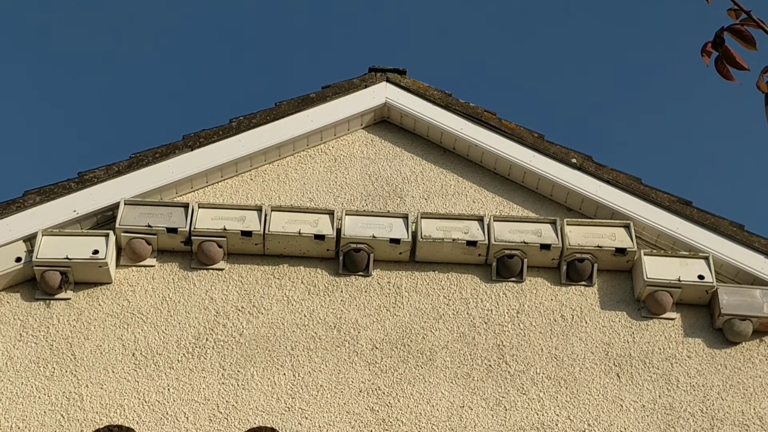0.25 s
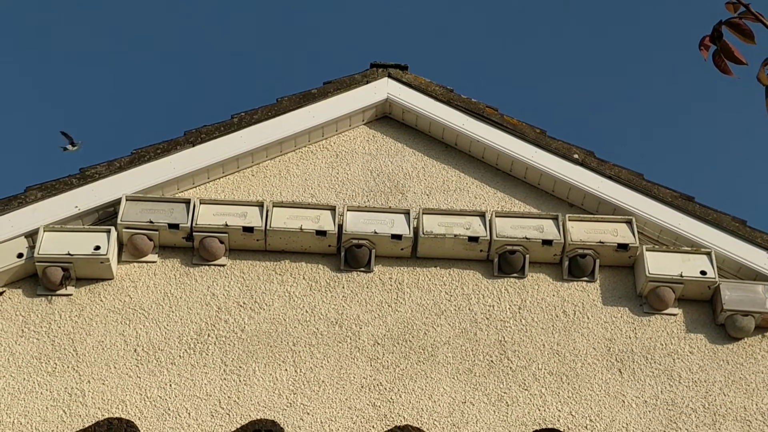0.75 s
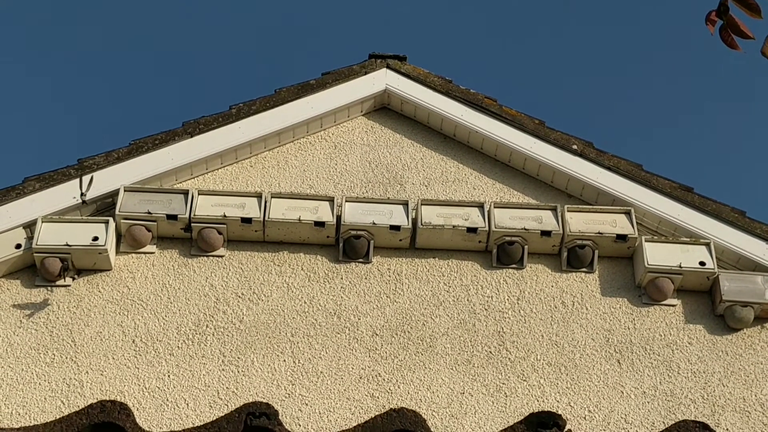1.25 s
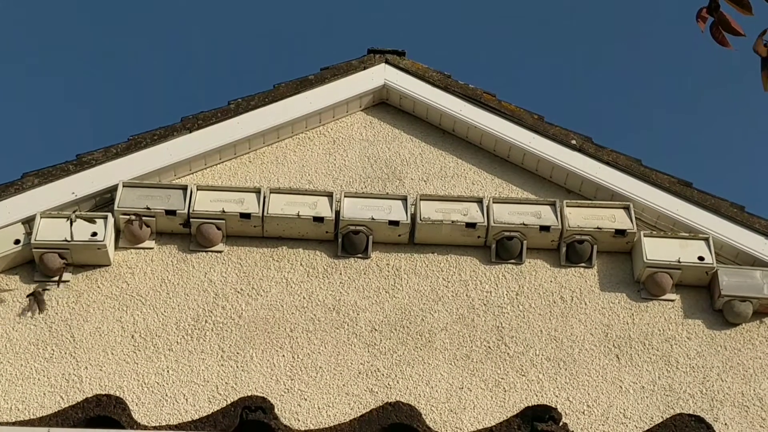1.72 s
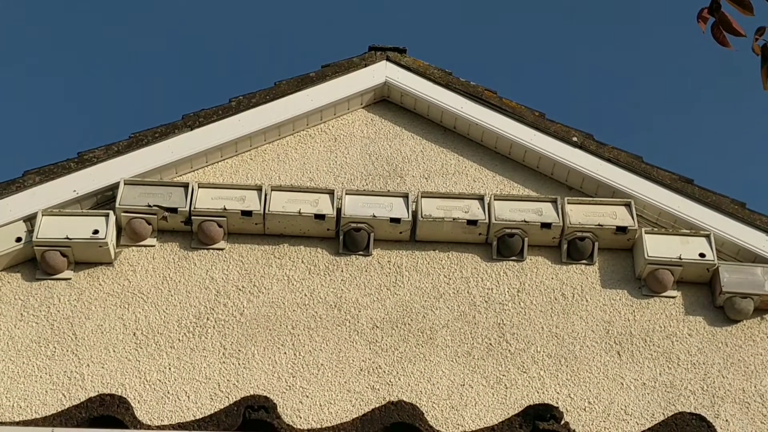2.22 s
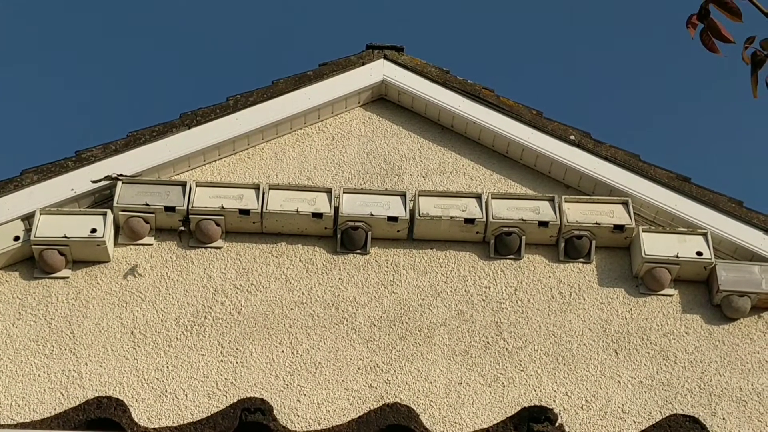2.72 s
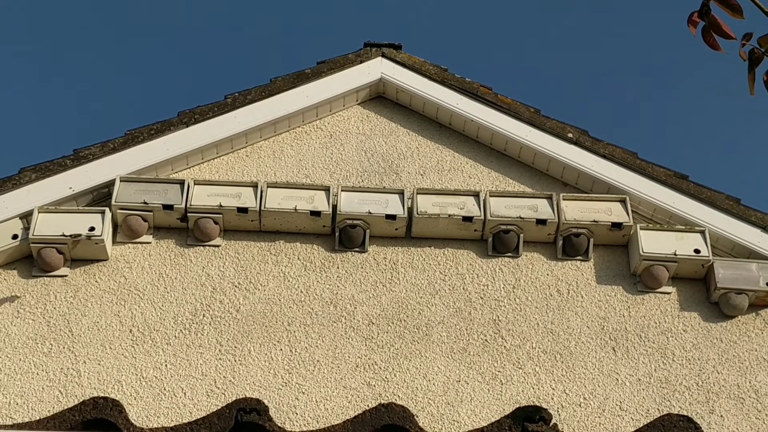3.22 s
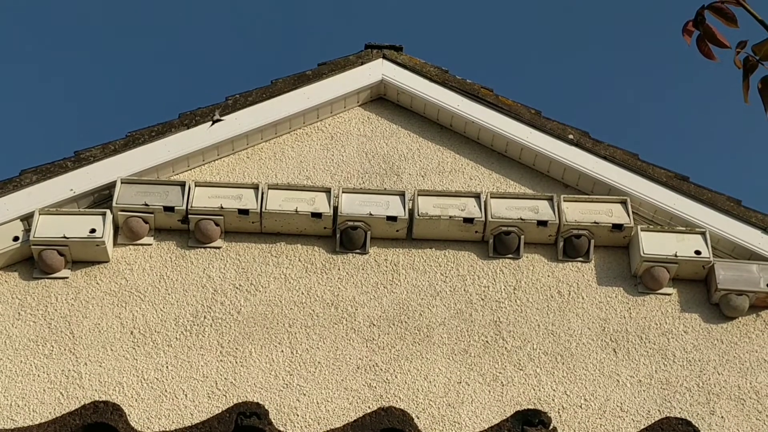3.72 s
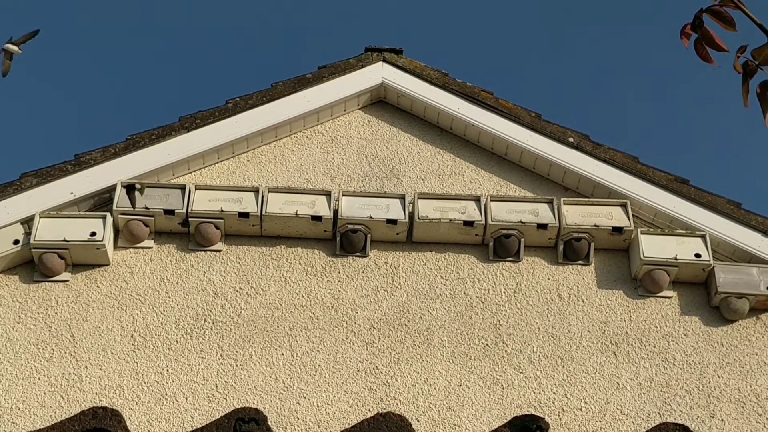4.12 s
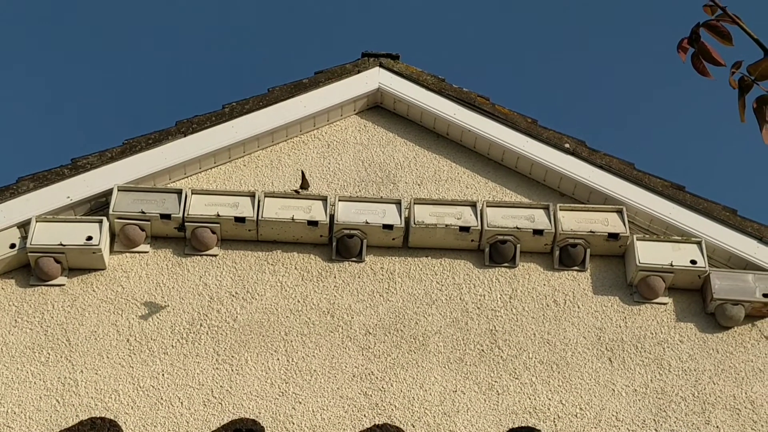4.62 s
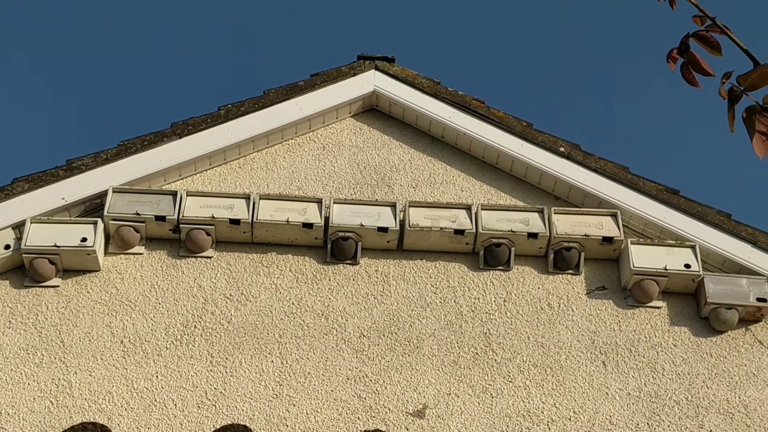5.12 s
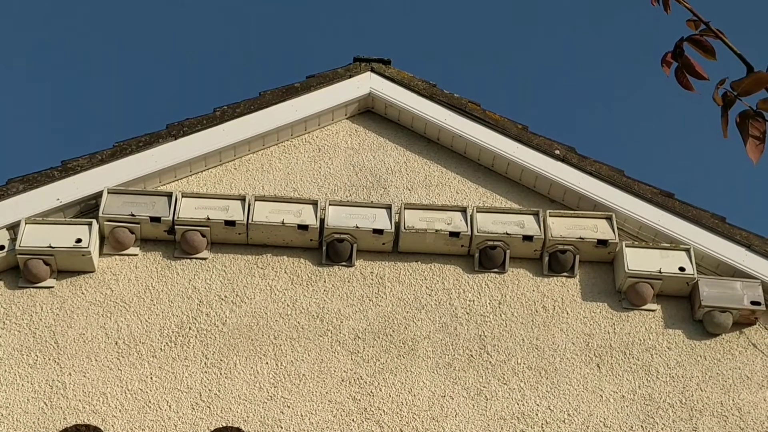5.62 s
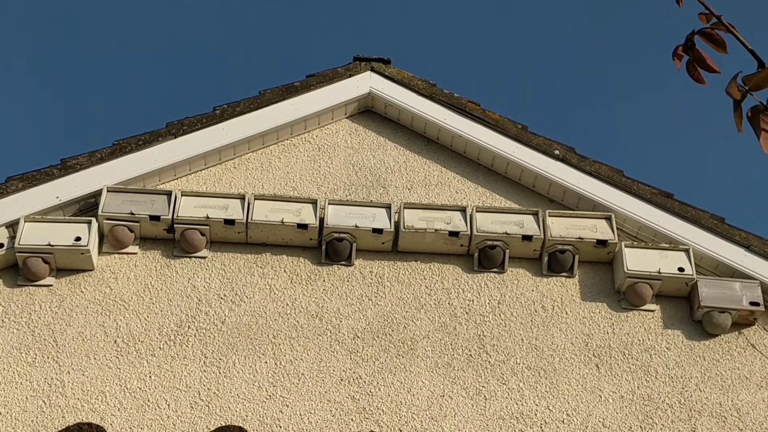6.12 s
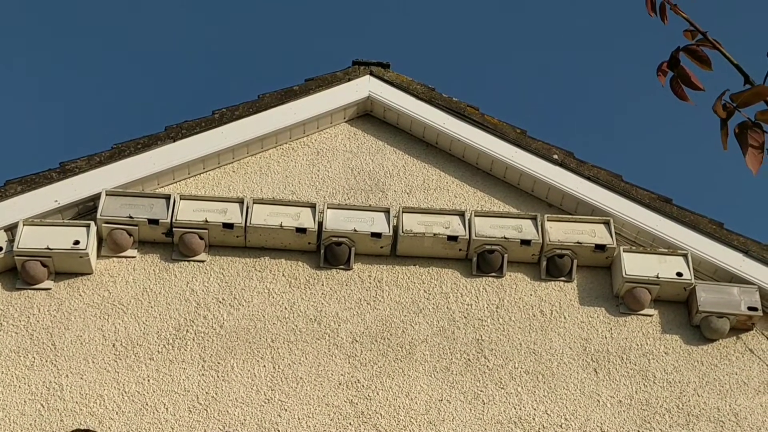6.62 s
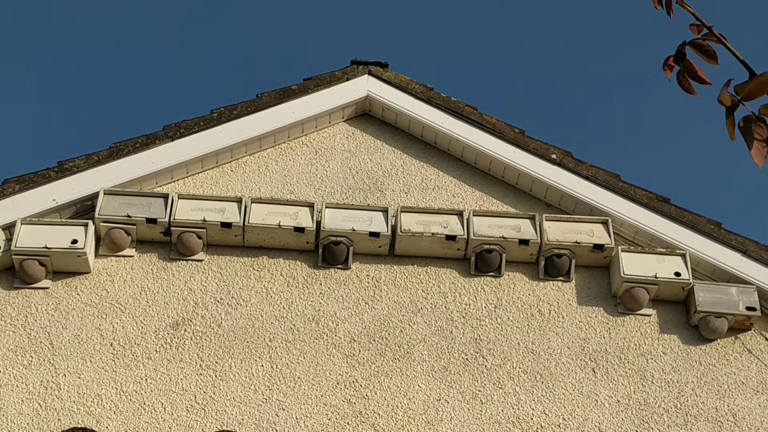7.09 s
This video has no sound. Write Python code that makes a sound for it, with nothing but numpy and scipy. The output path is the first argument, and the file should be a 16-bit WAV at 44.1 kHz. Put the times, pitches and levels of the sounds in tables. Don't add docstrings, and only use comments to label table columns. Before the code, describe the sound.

Several small swallow-like birds circle nests under a gable a few metres away, giving very short, dry, rising chirps, often in quick pairs. Calls crowd together from about one to three seconds, with a brief rattle at three, another busy spell from about 3.7 to 5.5, then become sparse. Walls return scattered echoes. Fainter birds call beyond, over low traffic rumble and soft hiss in a wide stereo outdoor pickup.

```python
import sys
import numpy as np
from scipy import signal
from scipy.fft import rfft, irfft, next_fast_len
from scipy.io import wavfile
from scipy.ndimage import uniform_filter1d

SR = 44100
rng = np.random.default_rng(int(sys.argv[2]) if len(sys.argv) > 2 else 0)


def gain_from_db(level_db):
    decades = np.asarray(level_db, float) / 20
    return 10 ** decades


def generate_wav(signal):
    frames = np.transpose(np.atleast_2d(signal))
    scaled = np.clip(frames, -1, 1) * 32767
    pcm = np.round(scaled).astype(np.int16)
    wavfile.write(sys.argv[1], SR, pcm)


N = 324115
LEAD = SR // 10


def level(x):
    return x / np.sqrt(np.mean(x ** 2))


def read(table, hz):
    f, v = np.transpose(table)
    return np.interp(np.log(np.maximum(hz, 1)), np.log(f), v)


def shape(x, gain):
    n = next_fast_len(x.shape[-1])
    hz = np.arange(n // 2 + 1) * SR / n
    return irfft(rfft(x, n) * gain(hz), n)[..., :x.shape[-1]]


def add(out, x, s, pan_db):
    i = LEAD + int(round(s * SR))
    x = x[:out.shape[1] - i]
    out[:, i:i + len(x)] += x * gain_from_db([[pan_db / 2], [-pan_db / 2]])


def chirp(start_hz, top_hz, second_db, upper_db, chance, rough=.05):
    rise, shut = .005 + abs(top_hz - start_hz) / 400e3, .002
    t = np.arange(int((rise + shut) * SR)) / SR
    q = np.minimum(t / rise, 1)
    glide = .5 + .5 * np.tanh(2.795 * (2 * q - 1.1)) / np.tanh(2.8)
    drop_hz = 1400 * (np.maximum(t - rise, 0) / shut) ** 2
    hz = start_hz + (top_hz - start_hz) * glide - drop_hz
    hz = hz * (1 + rough * level(uniform_filter1d(chance[-len(t):], size=30)))
    phase = 2 * np.pi * np.cumsum(hz) / SR

    k = np.arange(2, 7)[:, None]
    second = min(second_db, 16) + (upper_db - second_db) * np.abs(glide) ** 1.44
    upper = upper_db - 0.76 * (k - 3) - 9.8 * glide
    over_db = np.where(k == 2, second, upper)
    overtones = gain_from_db(over_db) * (k * hz < .4 * SR) * np.sin(k * (phase + chance[0]))

    beam = gain_from_db(.42 * (second_db + 17) * (glide - 1))
    overtones[0] *= beam
    throat = gain_from_db(4.5 * np.exp(-((hz - 3613) / 250) ** 2))
    voice = beam * throat * np.sin(phase) + np.sum(overtones, axis=0)

    rasp = 1 + .6 * np.tanh(level(uniform_filter1d(chance[:len(t)], size=30)))
    attack = np.clip(t / 0.0011, 0, 1) ** 2
    release = np.clip((t[-1] - t) / 0.0029, 0, 1)
    envelope = attack * release * gain_from_db(3.23 * glide)
    x = envelope * rasp * voice / np.sqrt(np.mean(gain_from_db(2 * read(HOUSING, hz))))

    gap = int(SR * (.003 + 0.001138 * np.tanh(chance[1])))
    reflection = gain_from_db(-8.5 + 3 * np.tanh(chance[2])) * np.pad(x, (gap, 0))
    return np.pad(x, (0, gap)) + reflection, rise


# (end of the first rise [s], level [dB], second note against first [dB], start [Hz], beak facing [dB])
QUICK_PAIRS = [(-0.035, -29, -2.5, 2637, -7), (0.0731, -30, -1, 2430, -5.5), (0.2225, -32, 1, 2060, -12),
               (1.3275, -30.5, -3, 3150, -7), (1.6677, -26, 0, 2520, 24), (1.7859, -30.5, 1.5, 2460, 21),
               (1.9977, -32, -2.5, 2770, -14), (2.1556, -27, 3.5, 2550, 31.5), (2.5218, -23, 1.5, 2570, 59),
               (3.7727, -28.5, -2, 2520, 0), (3.8577, -34.5, 1.5, 2830, -13), (3.9593, -29, 0.5, 2595, 2),
               (4.1147, -30.5, 3.5, 2480, 17.5), (4.4442, -25.5, 1, 2430, 20),
               (4.5365, -27.5, 0.5, 2550, 21), (4.6047, -30.5, 1.5, 2360, -4), (4.8898, -26, 2, 2537, 36),
               (4.9862, -31, 3, 2650, 21), (5.3788, -27.5, -7, 3324, 23.5), (5.4509, -36, 0.5, 4000, -12)]
# (end of the first rise [s], level [dB], second note against first [dB], start [Hz], beak facing [dB])
SLOW_PAIRS = [
    (0.311, -34, -1.5, 2950, -24),
    (1.361, -36.5, -5, 3090, -29),
    (1.8432, -41.5, -4, 1960, -8),
    (1.9067, -31.5, 1, 2410, -9),
    (1.9579, -32, -4, 3310, 3),
    (2.2572, -33, 2, 2400, -10),
    (2.3465, -33.5, 0.5, 2850, -15),
    (3.2971, -30.5, 4.5, 3710, 13),
    (3.3876, -30.5, 0, 2920, 4.5),
    (4.6932, -33.5, -0.5, 2700, -14),
]
# (end of the rise [s], level [dB], start [Hz], top [Hz], beak facing [dB])
LONE_CHIRPS = [(1.315, -36.5, 3750, 5100, -18), (1.4027, -32, 3265, 4110, -27),
               (1.466, -33.5, 1960, 4080, -6), (1.49, -31, 2735, 5400, -12), (1.514, -34, 2970, 5700, -17),
               (1.5866, -28, 1970, 5210, 2), (1.605, -23, 3346, 5530, -4), (1.8897, -40, 3440, 5600, 1.1),
               (2.0595, -28, 2430, 5320, 18), (2.0871, -25.5, 3934, 5710, 11), (2.3952, -33, 3400, 5160, 4),
               (2.5564, -40, 3270, 5400, 21), (2.763, -44, 2410, 5160, -4), (2.7813, -37.5, 3490, 5400, -6),
               (2.864, -39.5, 3490, 5500, -10), (2.883, -37.5, 2790, 4190, -1),
               (2.9034, -41, 3670, 4120, 12), (3.8134, -36, 4460, 4700, -23), (4.4826, -52, 3470, 5600, -3),
               (4.6487, -55, 2420, 5300, 1), (4.8516, -39, 2460, 5680, 14), (5.8399, -35, 2930, 5300, 11),
               (5.857, -35, 3630, 5300, 10), (6.332, -46.5, 2510, 5240, 19)]
# (end of the rise [s], level [dB], start [Hz], top [Hz], beak facing [dB])
RATTLE = [(3.0429, -35, 3330, 5300, 0), (3.065, -33.5, 4190, 4900, -9), (3.086, -37, 3830, 5500, -5),
          (3.1089, -50, 4000, 4800, -6), (3.126, -38, 2310, 4900, -5), (3.147, -32.5, 2970, 4700, -5),
          (3.1669, -26.5, 4370, 4700, -12), (3.181, -38, 4190, 4700, -9), (3.194, -36, 3980, 4800, -7),
          (3.2249, -36, 3060, 5200, -5), (3.2428, -36, 4080, 4700, -7), (3.2644, -37.5, 3410, 4600, -9)]
# (end of the rise [s], level [dB], start
# [Hz], top [Hz], beak facing [dB])
SOFT_CHIRPS = [(0.8218, -36.5, 2190, 5230, 12), (0.843, -35, 2980, 5100, 1), (0.9115, -39.5, 2780, 5300, -7),
               (0.9321, -36.5, 2896, 5400, -3), (0.957, -46, 2540, 4300, -2), (0.976, -52, 2370, 5000, 7),
               (0.996, -48, 2310, 4700, 19), (2.754, -42, 4500, 5200, -14), (2.9216, -37.5, 2944, 5600, 2),
               (3.3, -42, 3000, 4010, 1), (3.6984, -38, 2050, 4020, 1), (3.7185, -36.5, 3290, 5200, -12),
               (3.738, -40, 2380, 5090, -11), (4.415, -44, 3020, 5000, -17), (5.879, -42, 3000, 5400, 5),
               (5.9254, -36.5, 3900, 5500, -5), (5.943, -38, 3600, 5600, 2), (5.958, -39, 3570, 5630, -1),
               (5.975, -45, 3600, 4600, -5), (2.852, -51, 2900, 3300, -9), (2.892, -47.5, 2000, 2990, -2),
               (2.914, -47, 2000, 3290, 0), (3.04, -51, 1910, 2605, -1), (3.15, -48, 2400, 3200, 2),
               (3.24, -50, 2505, 1700, -10), (1.682, -45, 1920, 3800, 3), (1.72, -48, 2400, 1690, -15),
               (1.414, -43, 2000, 4000, 0), (4.37, -52, 2000, 3800, -1)]
# (end of the rise [s], level [dB], start [Hz], top [Hz])
FAR_CHIRPS = [(0.1944, -38, 4210, 4800), (0.4225, -53, 2680, 4700), (1.0222, -61, 4250, 4470),
              (2.802, -50, 2480, 2580), (2.95, -41.5, 2610, 5660), (3.026, -38, 2240, 5000),
              (3.659, -49.5, 2960, 3040), (4.0303, -63, 4170, 4600), (5.311, -47, 2210, 4800),
              (5.4926, -55, 3940, 4300), (5.818, -43, 2510, 5300), (6.2222, -57, 1990, 5300),
              (6.5386, -54, 1940, 5700), (7.143, -54, 2570, 5000), (7.21, -55, 1990, 5300),
              (7.282, -45, 4060, 4330)]
# (end of the first rise [s], level [dB], second note against first [dB], start [Hz], top [Hz])
FAR_PAIRS = [(0.4527, -48, 6.5, 2250, 5300), (0.586, -57.5, 11, 2480, 5500), (0.663, -48, 4, 2000, 5400),
             (1.119, -52, -26, 2010, 3920), (1.241, -51, 2, 3570, 4780), (3.496, -47.5, -4, 1980, 4700),
             (3.5714, -40.5, 1, 2170, 4750), (4.242, -45, 5.5, 3100, 4100), (4.3914, -44.5, -1, 3500, 4140),
             (5.122, -58.5, 13.5, 1990, 4210), (5.174, -45.5, -4, 2010, 4300),
             (5.334, -43.5, 2, 2110, 5020), (6.357, -45, 3.5, 2950, 5270), (6.429, -49.5, 5.5, 1940, 4430),
             (7.173, -59, 0, 2060, 5200)]
# (time [s], left minus right [dB], echo share [dB], upper overtones [dB])
FLIGHT = [(0, -3.5, 7, -6.5), (.4, -3.5, 3.5, -8), (.8, -2.5, 5, -17), (1.3, -2.5, 6.5, 1.5),
          (1.45, -0.5, 5.5, -10.5), (1.6, -2, 5, -3), (2.0, -2, 5, -10), (2.5, -3, 3, -5),
          (2.95, -2, 3.5, 2), (3.05, -7, 8.5, 5), (3.26, -9, 3, -7), (3.29, 1, 2, 0.5),
          (3.8, -3, 5.5, -2.5), (4.45, -3, 4, -5.5), (5.0, -3.5, 4.5, -6.5), (5.3, -3, 4, -12),
          (5.8, -2, 6, -10), (7.3, -4, 7.5, -9)]


def notes():
    when, _, _, upper = np.transpose(FLIGHT)
    upper_db = lambda s: np.interp(s, when, upper)
    second_start_hz = 3396
    far_overtones = (-3, -3)
    out = [(*row, upper_db(row[0])) for row in LONE_CHIRPS + RATTLE + SOFT_CHIRPS]
    out += [(*row, *far_overtones) for row in FAR_CHIRPS]
    for pairs, gap_s in ((QUICK_PAIRS, .0204), (SLOW_PAIRS, .0224)):
        for s, db, step_db, hz, facing_db in pairs:
            out.append((s, db, hz, 5300, facing_db, upper_db(s)))
            out.append((s + gap_s, db + step_db, max(hz, second_start_hz), 5400,
                        facing_db - 12.5, upper_db(s) + 2.5))
    for s, db, step_db, hz, top_hz in FAR_PAIRS:
        out.append((s, db, hz, top_hz, *far_overtones))
        out.append((s + .0202, db + step_db, second_start_hz, top_hz, *far_overtones))
    return sorted(out)


def circling_birds(yards=3):
    near, sent = np.zeros((2, N + LEAD)), np.zeros((yards, 2, N + LEAD))
    calls = notes()
    chances = rng.standard_normal((len(calls), SR // 20))
    when, pan, echo, _ = np.transpose(FLIGHT)
    for i, ((s, db, *voice), chance) in enumerate(zip(calls, chances)):
        x, rise = chirp(*voice, chance)
        pan_db, echo_db = np.interp(s, when, pan), np.interp(s, when, echo)
        add(near, x * gain_from_db(db + 1 - 0.85 * echo_db), s - rise - .001, pan_db)
        add(sent[i % yards], x * gain_from_db(db - 20 + echo_db), s - rise, pan_db)
    return near, sent


def yard(x, t60=.28, late_t60=1.1, late_db=-19, patchy_db=7, shared=.35, onset=.022):
    t = np.arange(SR // 2) / SR
    decay = gain_from_db(-60 * t / t60) + gain_from_db(late_db - 60 * t / late_t60)
    fade = decay * np.clip(t / onset, 0, 1)
    patches = rng.standard_normal((len(x), 1, len(t) // 40 + 1))
    patches = np.repeat(patches, 40, axis=2)[..., :len(t)]
    grains = rng.standard_normal((len(x), 3, len(t))) * gain_from_db(patchy_db * patches)
    echo = fade * (np.sqrt(shared) * grains[:, :1] + np.sqrt(1 - shared) * grains[:, 1:])
    echo = shape(echo, lambda hz: gain_from_db(-9 * (hz / 10000) ** 2 - 3 * np.tanh((hz - 6100) / 300)))
    echo = echo / np.sqrt(np.sum(echo ** 2) / (2 * len(x)))
    n = next_fast_len(x.shape[-1] + len(t))
    return irfft(np.sum(rfft(x, n) * rfft(echo, n), axis=0), n)[:, :x.shape[-1]]


# (frequency [Hz], gain [dB])
HOUSING = [(1300, -20.5), (2200, -2.5), (3100, -0.5), (3650, 2.5), (4300, 5), (5150, 4), (5650, 0),
           (5950, -18), (6900, -8), (8000, -34), (8800, -25.5), (9500, -30), (10300, -17), (11200, -15),
           (12200, -5.5), (13100, -19), (14500, -17), (15700, -32)]
# (frequency [Hz], gain [dB])
RIGHT_PORT = [(2500, -3), (3700, -.4), (6500, -.4), (7800, -2.5), (10000, -6), (12000, -11), (15000, -12)]
# (frequency [Hz], phase [rad])
RIGHT_TWIST = [(1500, 0), (3300, .65), (5200, 0), (7000, -.7), (9300, -.1), (11000, -1.6), (12500, -1)]


def ports(x):
    def gain(hz):
        delay = 2 * np.pi * hz * 4.75 / SR
        right = gain_from_db(read(RIGHT_PORT, hz)) * np.exp(1j * (read(RIGHT_TWIST, hz) - delay))
        return gain_from_db(read(HOUSING, hz)) * np.array([np.ones(len(hz)), right])
    return shape(x, gain)[:, LEAD:]


# (time [s], peak level [dB], frequency [Hz], left minus right [dB])
SEEPS = [
    (0.7721, -82, 7350, -4),
    (5.769, -75, 6500, -2),
    (5.9514, -83, 6930, 3),
    (5.9634, -72, 6800, -4.0),
    (6.021, -71.5, 6700, -9),
    (6.9067, -80, 6600, -7),
    (7.029, -72.5, 6630, -8),
    (7.052, -72.5, 7150, -3.0),
    (7.06, -72.5, 7250, -5),
]
# (time [s], level [dB], frequency [Hz], length [s])
FAR_NOTES = [
    (5.45, -69, 2120, 0.18),
    (5.48, -90, 2870, 0.27),
    (6.309, -60.5, 1320, 0.077),
    (6.688, -66, 1514, 0.1),
    (6.899, -66, 1490, 0.087),
    (7.117, -65, 1524, 0.053),
]


def distant_birds():
    out = np.zeros((2, N + LEAD))
    for s, db, hz, pan_db in SEEPS:
        t = np.arange(int(0.025 * SR)) / SR
        phase = 2 * np.pi * np.cumsum(hz * (1.08 - 7 * t)) / SR
        add(out, gain_from_db(db + 27) * np.hanning(len(t)) * np.sin(phase), s - .007, pan_db)
    for s, db, hz, length in FAR_NOTES:
        n = int(length * SR)
        waver = .018 * level(uniform_filter1d(rng.standard_normal(SR), size=SR // 60))[:n]
        phase = 2 * np.pi * np.cumsum(hz * (1 + waver)) / SR
        add(out, gain_from_db(db + 3.5 - read(HOUSING, hz)) * np.hanning(n) * np.sin(phase), s, -1.5)
    return out


# (frequency [Hz], correlation [1])
LIKENESS = [
    (60, 0.95),
    (300, 0.92),
    (640, 0.53),
    (1400, 0.0096),
]


def wide_noise(gain):
    def mid_side_gain(hz):
        like = np.clip(read(LIKENESS, hz), 0, 1)
        return gain(hz) * np.sqrt([1 + like, 1 - like])
    mid, side = shape(rng.standard_normal((2, N)), mid_side_gain)
    return np.array([mid + side, mid - side]) / np.sqrt(np.mean(mid ** 2))


# (frequency [Hz], density [dB per Hz])
TRAFFIC = [(11, -56), (18, 6), (48, 2.5), (63, -2), (118, -14.5), (180, -13.5), (239, -15.5), (325, -15),
           (416, -19.5), (484, -17), (794, -17.5), (1020, -22.5), (1700, -33.5), (2210, -58), (3740, -120)]
# (time [s], rumble [dB], tyre roar [dB])
ROAD = [(0.0, -46.5, -56), (0.37, -54.5, -56), (0.71, -50.5, -58), (1.02, -55.5, -58.5), (1.39, -50, -57.5),
        (3.19, -53, -56.5), (3.25, -46.5, -55.5), (3.5, -57, -54.5), (3.62, -49.5, -57.5),
        (4.95, -49.5, -56), (5.09, -53, -58), (5.57, -48, -56.5), (5.96, -54.5, -58), (6.32, -48.5, -57),
        (6.94, -54.5, -56.5), (7.25, -47.5, -58.5), (7.35, -51, -56)]
# (frequency [Hz], width [Hz], level against the rumble [dB])
ENGINE_LINES = [
    (52.0, 5, -8),
    (181.8, 5.8, -17.5),
]


def traffic():
    t = np.arange(N) / SR
    s, rumble_points, roar_points = np.transpose(ROAD)
    rumble_db, roar_db = np.interp(t, s, rumble_points), np.interp(t, s, roar_points)
    rumble = wide_noise(lambda hz: gain_from_db(read(TRAFFIC, hz)) * (hz < 90))
    roar = wide_noise(lambda hz: gain_from_db(read(TRAFFIC, hz)) * (hz >= 90))
    engines = 0
    for f, width, db in ENGINE_LINES:
        engines = engines + gain_from_db(db) * wide_noise(lambda hz: 1 / (1 + ((hz - f) / width) ** 2))
    passing = np.exp(-((t - 6.77) / 0.85) ** 2)
    car = wide_noise(lambda hz: np.exp(-((hz - 1290) / 250) ** 2)) * gain_from_db(-72.5) * passing
    return car + (gain_from_db(-1.5) * rumble + engines) * gain_from_db(rumble_db) + roar * gain_from_db(roar_db)


def walk(rate):
    k = int(SR / rate)
    held = np.repeat(rng.standard_normal(N // k + 1), k)
    return 2.24 * uniform_filter1d(uniform_filter1d(held, k), k)[:N]


# (frequency [Hz], density [dB per Hz])
AIR = [(1000, -32), (1700, -4), (2890, -3.5), (3110, -1), (3350, -8), (4000, -7.5), (5380, -9), (5850, -15),
       (6980, -11.5), (8250, -16), (15700, -11)]


def leaves_and_air():
    air = wide_noise(lambda hz: gain_from_db(read(AIR, hz))) * gain_from_db(-69)
    air = air * gain_from_db(.6 * walk(5))
    return shape(air, lambda hz: gain_from_db([0 * hz, .4 * read(RIGHT_PORT, hz)]))


def scene():
    near, sent = circling_birds()
    far = distant_birds()
    sent[0] += gain_from_db(-14) * far
    background = (traffic() + leaves_and_air()) * gain_from_db([[-.3], [.3]])
    return ports(near + far + yard(sent)) + background


def low_pass(x):
    return signal.sosfilt(signal.butter(12, 15810, fs=SR, output="sos"), x)


def record(dry):
    mix = shape(dry, lambda hz: hz < 15600)
    return low_pass(mix)


dry = scene()
out = record(dry)
generate_wav(out)
```